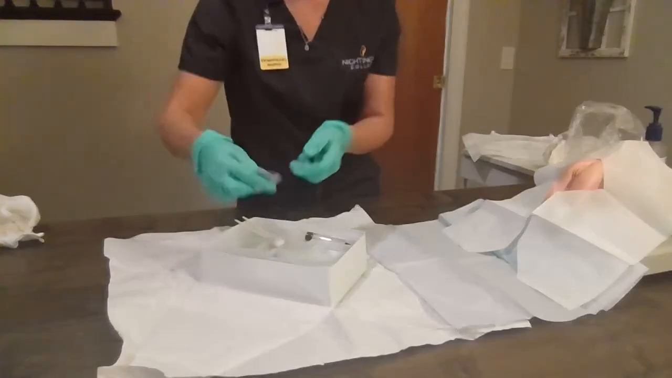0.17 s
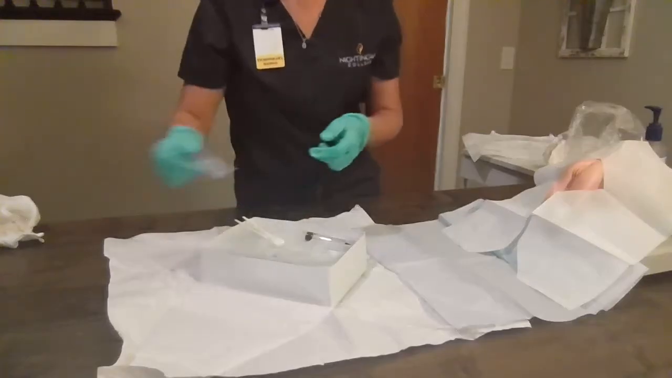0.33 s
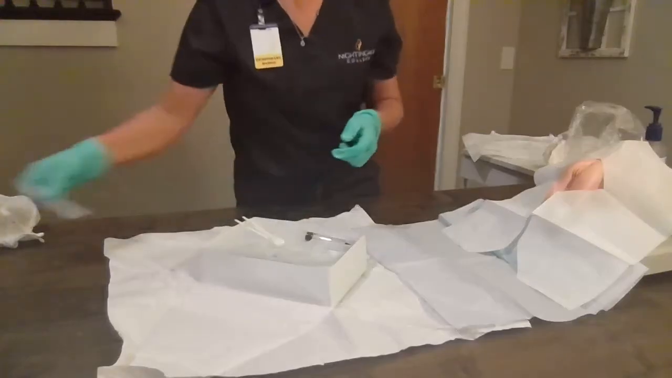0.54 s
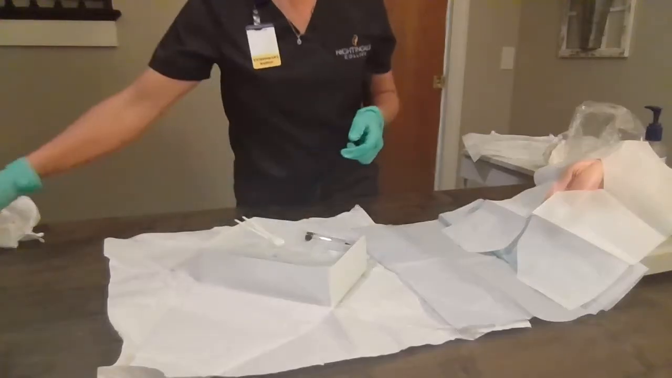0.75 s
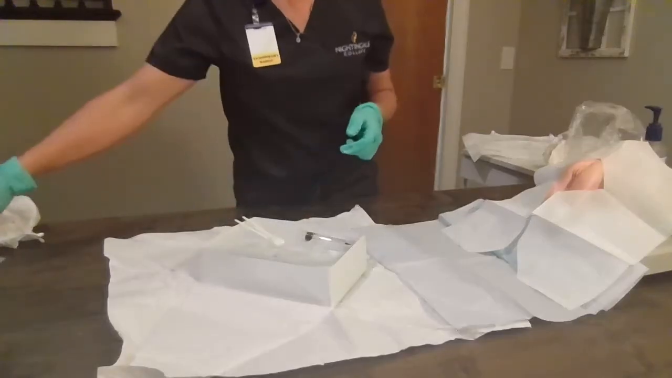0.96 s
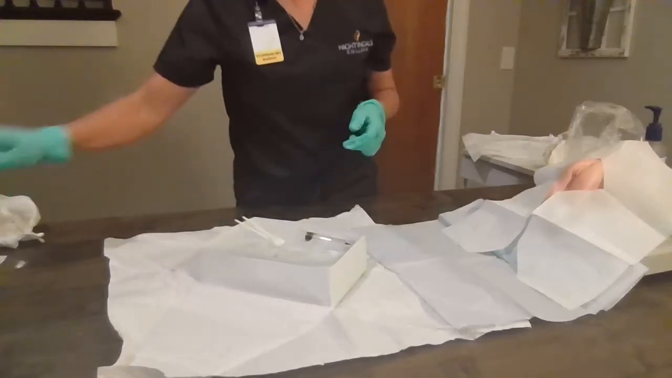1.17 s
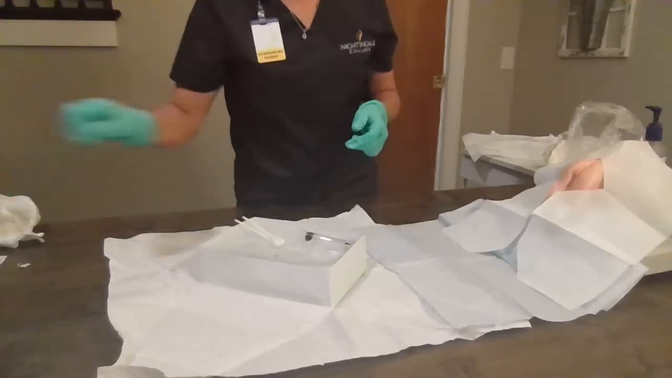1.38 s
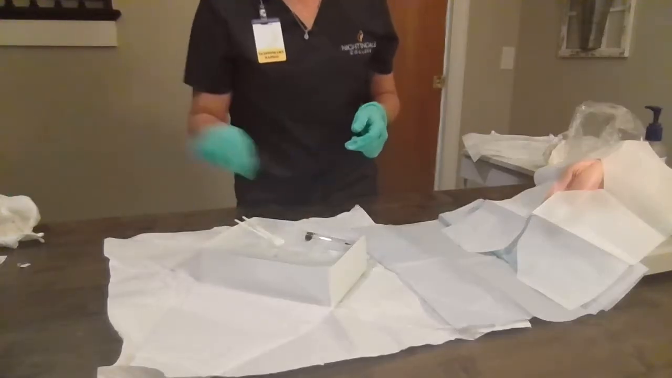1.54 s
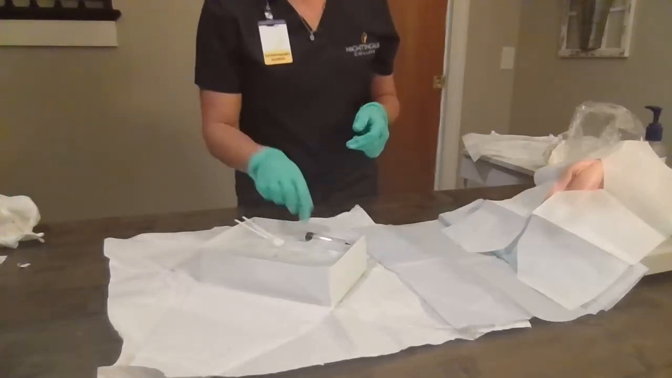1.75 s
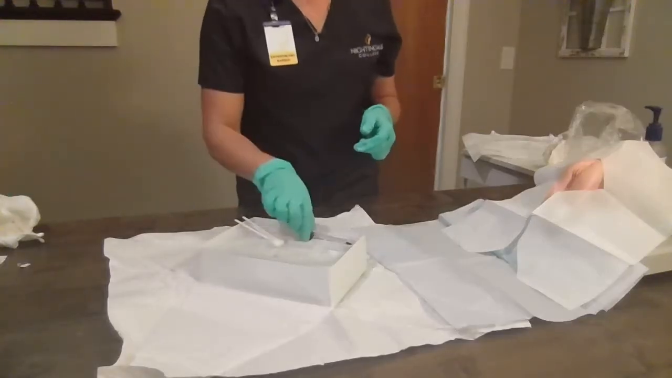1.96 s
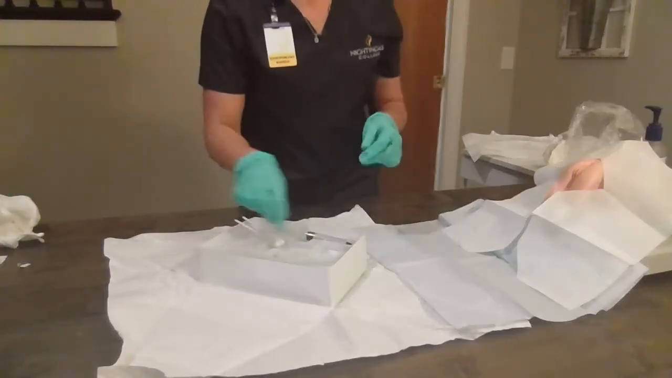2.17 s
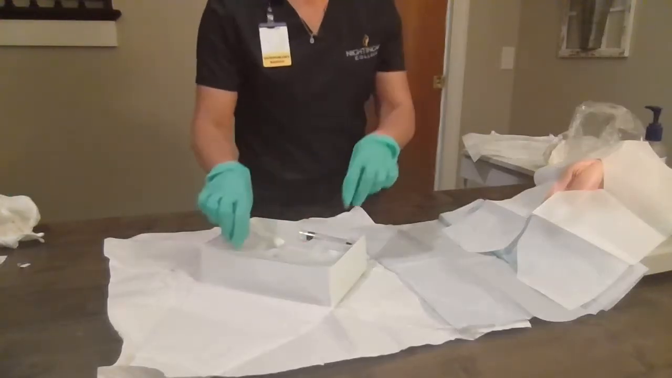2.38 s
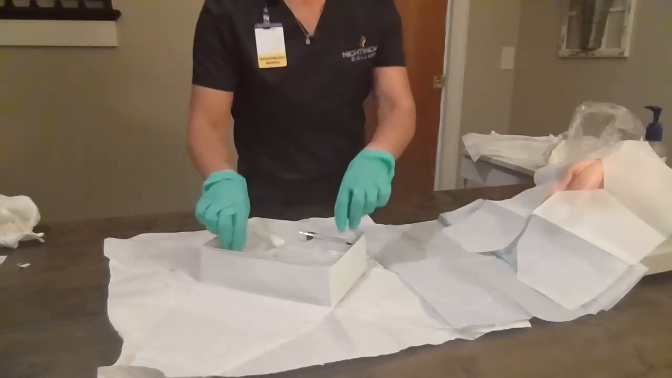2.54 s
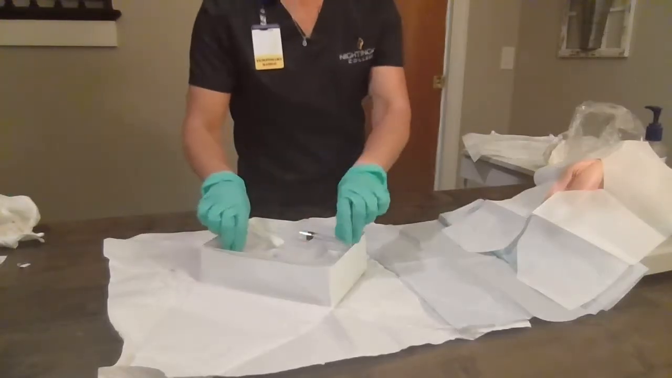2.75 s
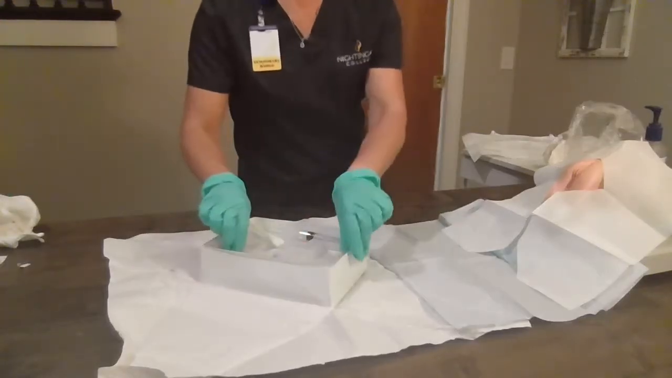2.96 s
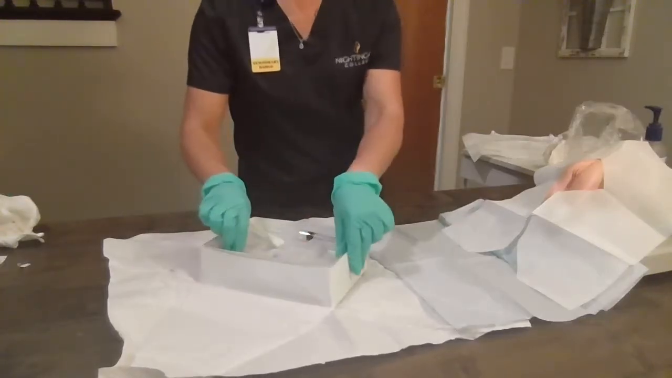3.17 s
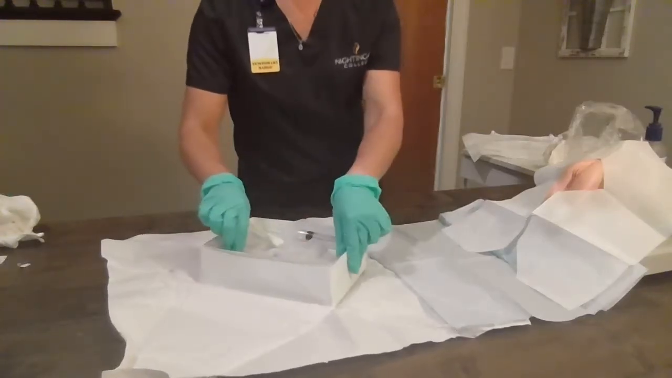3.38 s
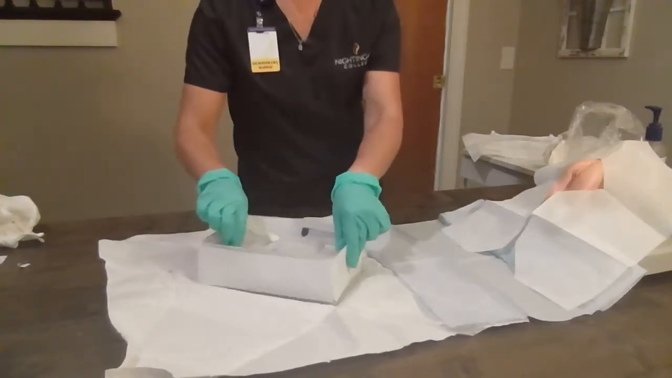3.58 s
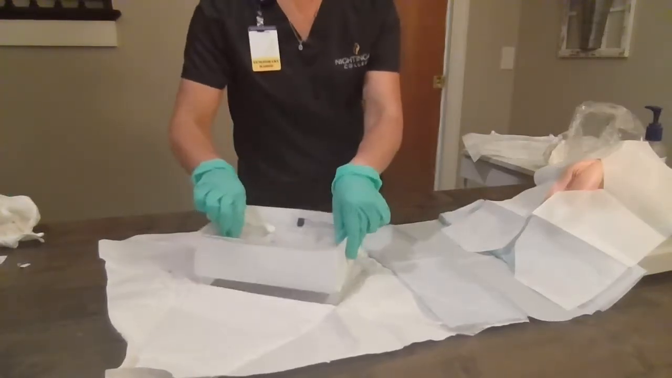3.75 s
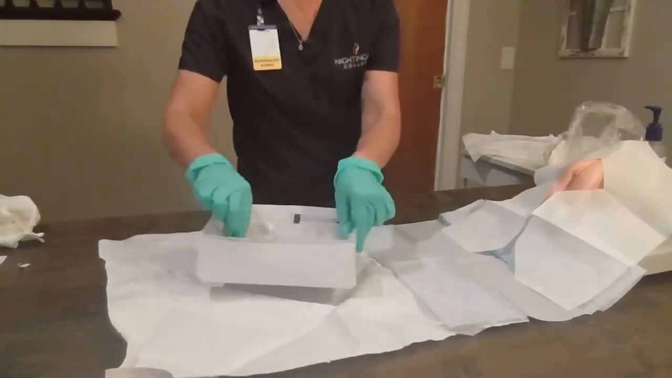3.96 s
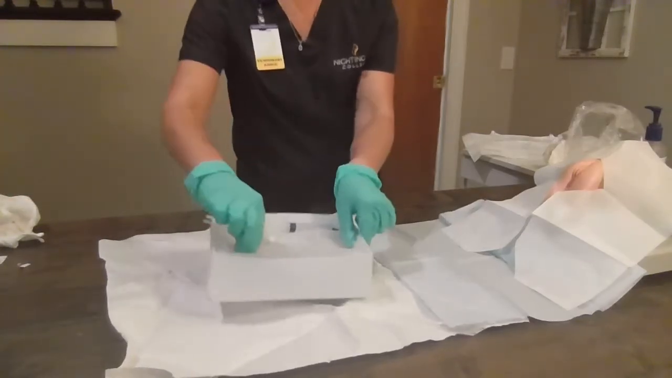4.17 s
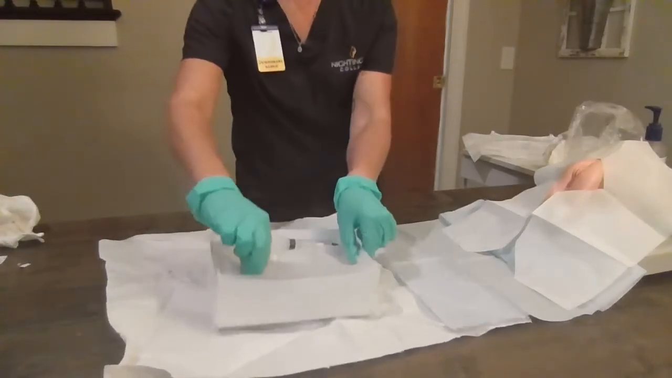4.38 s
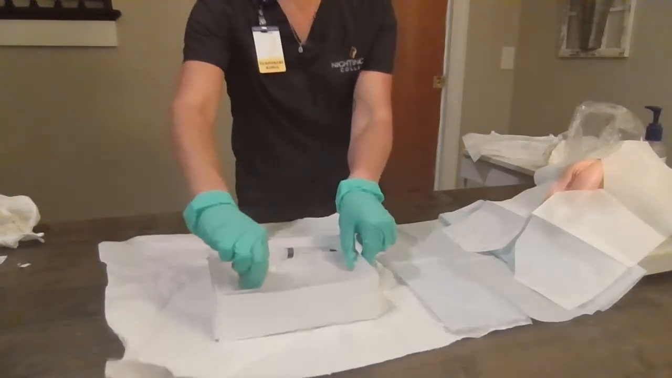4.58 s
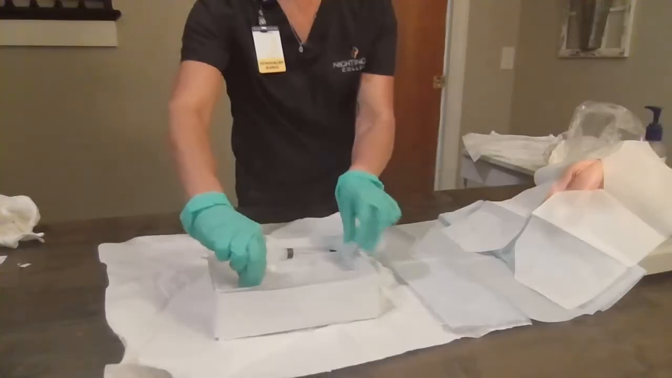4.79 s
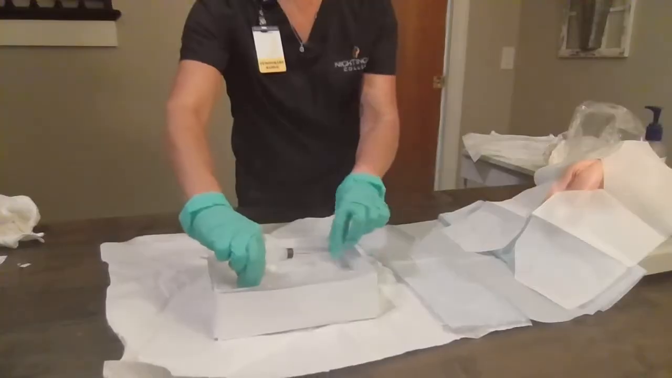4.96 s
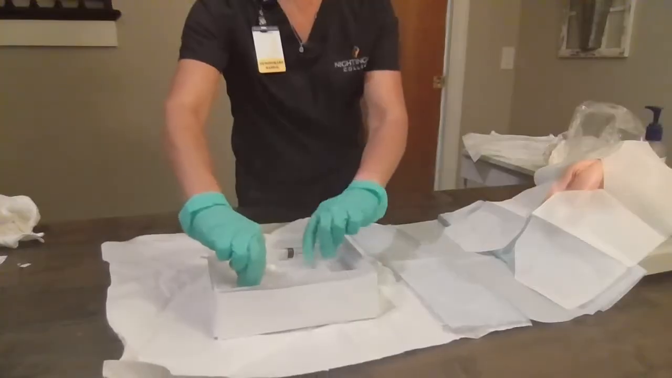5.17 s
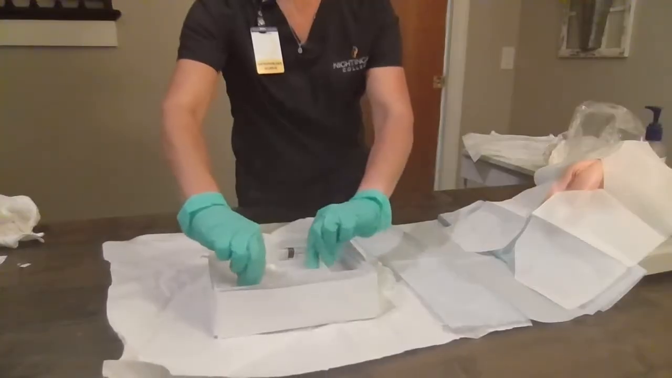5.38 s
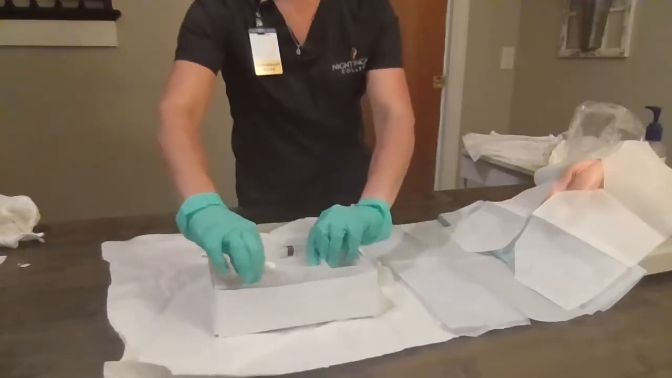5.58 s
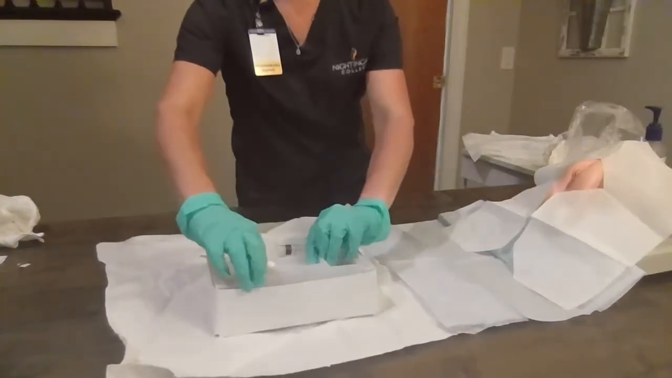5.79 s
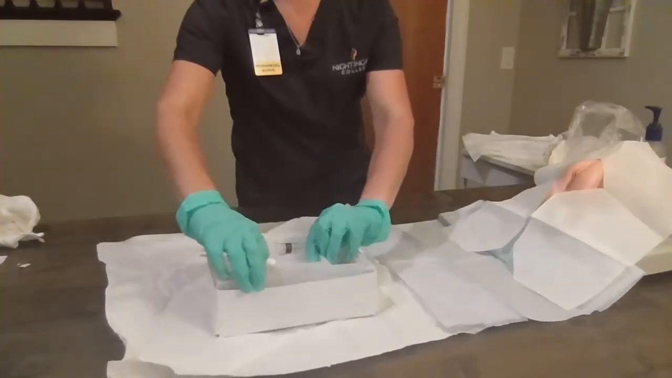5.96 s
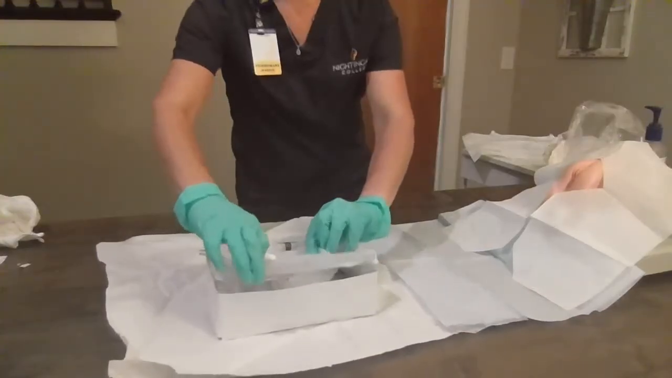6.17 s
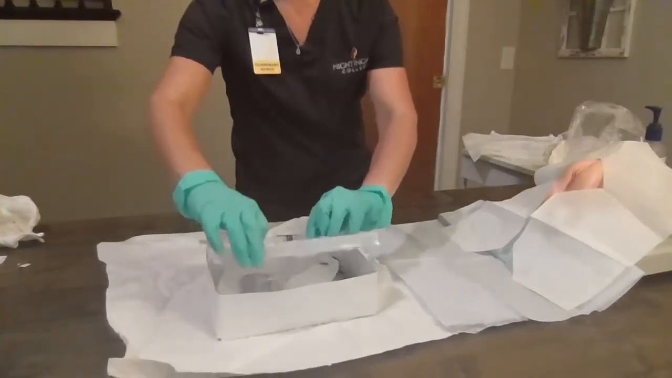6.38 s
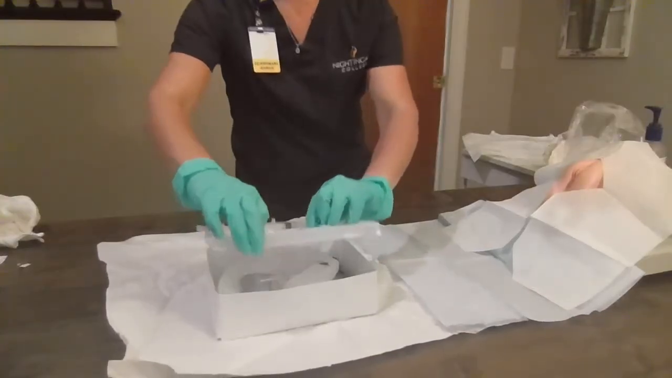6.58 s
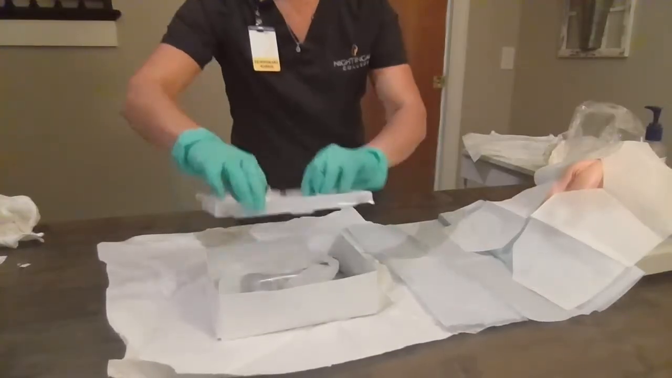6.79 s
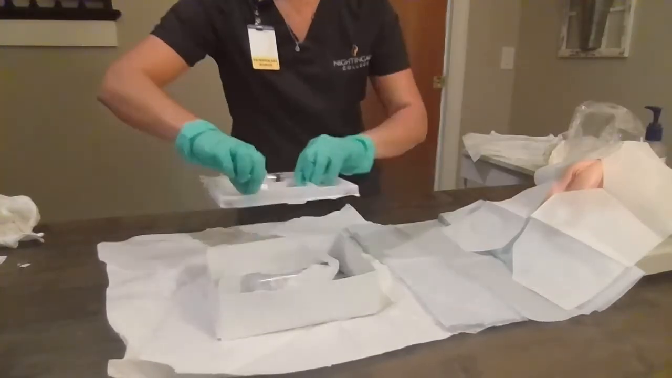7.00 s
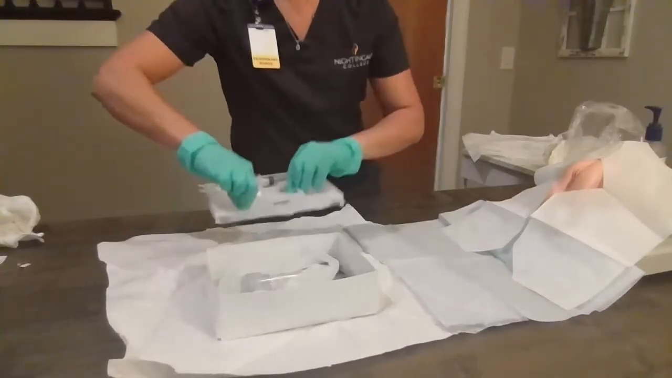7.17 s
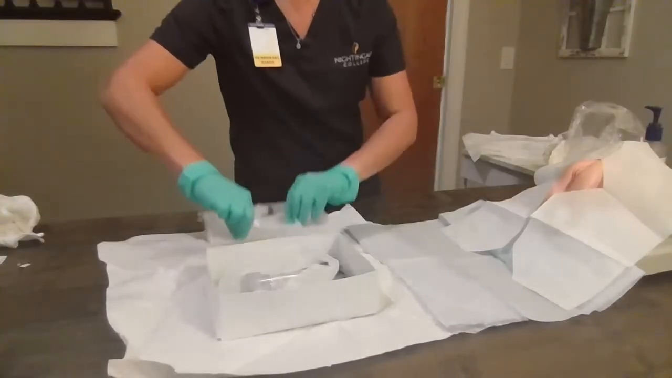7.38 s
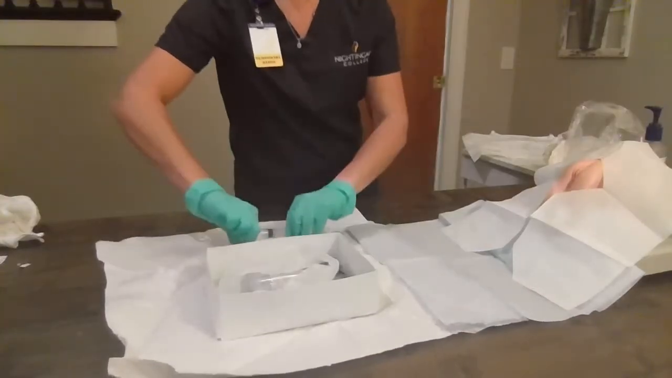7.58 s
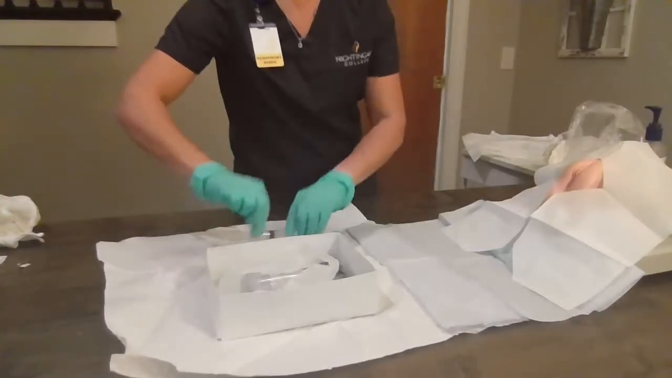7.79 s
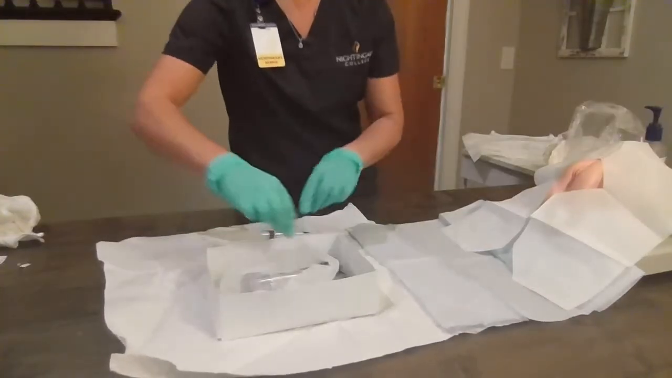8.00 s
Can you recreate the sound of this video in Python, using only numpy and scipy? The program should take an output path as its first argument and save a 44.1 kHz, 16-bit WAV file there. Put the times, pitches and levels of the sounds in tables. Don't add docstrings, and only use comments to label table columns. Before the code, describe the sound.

Gloved hands handle a thin hollow plastic tray: faint taps and rustles, a soft set-down, then loud cracking pops as its insert pulls free.

```python
import sys
import numpy as np
from scipy import signal
from scipy.fft import rfft, irfft
from scipy.io import wavfile
from scipy.ndimage import uniform_filter1d

SR = 44100
rng = np.random.default_rng(int(sys.argv[2]) if len(sys.argv) > 2 else 0)


def invert_db(level):
    return 10 ** (np.asarray(level, dtype=float) / 20)


def store_wav(level_fs):
    pcm = np.round(np.clip(np.atleast_2d(level_fs), -1, 1) * 32767)
    wavfile.write(sys.argv[1], SR, pcm.T.astype(np.int16))


N = 354475


def unit(x):
    return x / np.sqrt(np.mean(x ** 2))


def band(x, lo_hz, hi_hz):
    return signal.sosfilt(signal.butter(2, [lo_hz, min(hi_hz, .45 * SR)], "band", fs=SR, output="sos"), x)


def add(out, s, x):
    i = int(s * SR)
    out[i:i + len(x)] += x[:N - i]


def walk(rate_hz):
    hold = int(SR / rate_hz)
    levels = np.repeat(rng.standard_normal(N // hold + 1), hold)
    return np.sqrt(3 / 2) * uniform_filter1d(levels, hold)[:N]


def swell(s, rise_s, fall_s, db, roundness):
    t = np.arange(N) / SR - s
    distance = np.where(t < 0, -t / max(rise_s, .002), t / max(fall_s, .002))
    return invert_db(db - 20 * distance ** roundness)


def ringing(modes, t, weight_db=0):
    hz, db, t60 = np.transpose(modes)[:, :, None]
    decay = 1000. ** (-t / np.maximum(t60, .005))
    return np.sum(invert_db(db + weight_db) * np.sin(2 * np.pi * hz * t) * decay, axis=0)


def knocks(table, modes, slope_db, under_db, top_hz, blow=.95, count=64):
    out, t = np.zeros(N), np.arange(6144) / SR

    def tilt(octave):
        return np.where(octave > 0, slope_db, under_db) * octave

    for s, db, hz, crack_db, chatter_s in table:
        noise = rng.standard_normal((3, len(t)))

        crowd = np.linspace(-.9, 2.5, count) + .03 * rng.standard_normal(count)
        octave = np.r_[0, crowd][:, None]
        size = np.tanh(2 * noise[2, :count + 1, None]) * invert_db(-4 + tilt(octave))
        size[0] = 1.3
        t60 = .03 * 2 ** (-.4 * octave)
        ring = np.sum(size * np.sin(2 * np.pi * hz * 2 ** octave * t) * 1000. ** (-t / t60), axis=0)

        mode_hz = np.array(modes)[:, :1]
        spot_db = 5 * noise[2, -len(modes):, None] + tilt(np.log2(mode_hz / hz))
        ring = ring + ringing(modes, t, spot_db)

        age = t / max(chatter_s, .0005)
        fade = np.exp(-age) if blow else age * np.exp(1 - age) * np.exp(-.3 * age ** 2)
        push = .25 * noise[0] * np.minimum(abs(noise[0]), 2) * fade
        push[0] = blow
        body = band(signal.fftconvolve(push, ring)[:len(t)], 0.52 * hz, top_hz)
        body = band(body, 210, 14000)
        crack = band(noise[1] * fade, 3600, 13000)
        tick = band(np.exp(-t / 0.00006), 0.76 * hz, 3 * hz) * (blow > 0)
        knock = body / abs(body).max()
        knock = knock + invert_db(-7) * tick / (abs(tick).max() + 1e-9)
        knock = knock + invert_db(crack_db - 4.5) * crack / abs(crack).max()
        add(out, s, invert_db(db) * knock)
    return out


# (frequency [Hz], level [dB], t60 [s])
TRAY_MODES = [(296, -18, 0.15), (376, -15.5, 0.056), (471, -6, 0.09), (631, 6.5, 0.04), (775, 4, 0.035),
              (945, -7.5, 0.038), (1116, -3, 0.043), (1274, 2.5, 0.042), (1560, 0, 0.027),
              (1900, -11, 0.082), (2120, -26.5, 0.044), (2790, -19, 0.064), (3180, -13.5, 0.034),
              (3970, -45, 0.027)]
# (time [s], peak [dB], main ring [Hz], treble crack [dB], chatter time [s])
POPS = [(5.587, -30.5, 950, 6.5, 0.043), (5.607, -21.5, 1230, -19, 0.0074),
        (5.874, -17, 617, -32.5, 0.0048), (5.939, -20, 566, -1, 0.0075), (6.003, -15, 1300, -3, 0.012),
        (6.0135, -6.5, 480, 3, 0.0016), (6.1575, -8, 623, -1, 0.0032), (6.167, -17.5, 673, -3, 0.0092),
        (6.26, -13, 1325, 0.5, 0.0031), (6.277, -12.5, 1270, 2, 0.009), (6.2985, -14, 1300, 4, 0.0045),
        (6.318, -20, 1445, 2, 0.0068), (6.344, -14.5, 1350, -9.5, 0.0057), (6.4805, -1, 698, -1.5, 0.0036),
        (6.484, -5, 460, -20.5, 0.0033), (6.491, -11, 1100, -15.5, .012)]


def insert_pops():
    return knocks(POPS, TRAY_MODES, slope_db=-1, under_db=14.5, top_hz=9000)


# (time [s], peak [dB], main ring [Hz], treble crack [dB], chatter time [s])
TRAY_KNOCKS = [
    (3.218, -29.5, 1570, 1, 0.014),
    (4.528, -22.5, 873, -20, 0.0073),
    (4.59, -27.5, 950, -30, 0.0074),
    (4.628, -31.5, 800, -30, 0.0061),
    (4.638, -30, 647, -30, 0.0086),
    (4.723, -26.5, 907, -35, 0.012),
]


def tray_knocks():
    return knocks(TRAY_KNOCKS, TRAY_MODES, slope_db=0.5, under_db=12, top_hz=6000)


# (time [s], peak [dB], main ring [Hz], treble crack [dB], time to the peak [s])
SCUFFS = [(1.876, -47, 1400, -15, 0.011), (2.671, -44.5, 640, -29, 0.0048), (2.949, -51, 1130, -28, 0.031),
          (3.374, -39, 740, -17, 0.0032), (3.49, -47, 1300, -23.5, 0.028), (3.716, -40, 1130, -6, 0.015),
          (4.482, -31, 560, 1, 0.034), (4.538, -32, 950, -11, 0.0089), (4.806, -45.5, 664, -9, 0.0091),
          (4.859, -46.5, 910, 3, 0.013), (5.099, -56, 750, 10, 0.011), (5.386, -34.5, 630, -25, 0.014),
          (5.508, -32, 466, -24, 0.014), (5.568, -23.5, 945, -17, 0.041), (5.715, -23.5, 580, -22, 0.011),
          (5.826, -22, 590, -11, 0.016), (5.848, -15, 620, -10, 0.011), (6.088, -15, 630, -6, 0.018)]


def tray_scuffs():
    return knocks(SCUFFS, TRAY_MODES, slope_db=-6, under_db=15.5, top_hz=6000, blow=0)


# (frequency [Hz], level [dB], t60 [s])
INSERT_MODES = [(420, -22, 0.067), (800, -5, 0.13), (1100, -17, 0.13), (1300, -11, 0.08), (1500, 7, 0.03),
                (1625, -6, 0.047), (1900, -5.5, 0.05), (2328, -6.5, 0.037), (2703, -1.5, 0.034),
                (3100, -2, 0.035), (3480, -16, 0.033), (4720, -10, 0.045), (5500, -11, 0.035)]
# (time [s], peak [dB], main ring [Hz], treble crack [dB], chatter time [s])
RATTLES = [
    (6.793, -34, 1450, -26, 0.0047),
    (6.821, -22.5, 1500, -10, 0.0068),
    (7.005, -42.5, 760, -40, 0.006),
    (7.059, -39, 1460, -36.5, 0.014),
    (7.097, -47, 1500, -30, 0.0058),
    (7.365, -27, 1595, -24, 0.0053),
    (7.372, -29.5, 847, -38, 0.05),
    (7.476, -20, 1303, -14, 0.017),
    (7.676, -26, 1300, -1, 0.0047),
    (7.685, -24, 1900, -6, 0.034),
]


def insert_rattles():
    return knocks(RATTLES, INSERT_MODES, slope_db=-0.2, under_db=7, top_hz=7000)


# (time [s], peak [dB], main ring [Hz], treble crack [dB], time to the peak [s])
SLIDES = [
    (6.812, -19.5, 1500, -15, 0.012),
    (7.088, -26.5, 800, -40, 0.012),
    (7.39, -22, 825, -34, 0.02),
    (7.626, -21, 1533, -3.5, 0.019),
]


def insert_slides():
    return knocks(SLIDES, INSERT_MODES, slope_db=-0.5, under_db=37, top_hz=7000, blow=0)


# (frequency [Hz], level [dB], t60 [s])
SCRAP_MODES = [(705, -3, .05), (1100, -8, .04), (1570, -1, .06), (1710, -7, .035), (1940, -4, .06),
               (2200, -5, .06), (2540, -5, .03), (2920, -6, .035), (3880, -15, .03)]
# (time [s], peak [dB], main ring [Hz], treble crack [dB], chatter time [s])
DROPS = [
    (0.904, -38.5, 1100, -25, 0.007),
    (0.9195, -20, 728, -10, 0.0071),
    (0.919, -21.5, 1500, -20, 0.0033),
    (0.93, -19.5, 730, -2, 0.0042),
    (0.944, -24, 1680, -20, 0.017),
    (0.996, -24.5, 1010, -1, 0.0078),
    (1.012, -41, 2900, -23, 0.01),
]


def scrap_drops():
    return knocks(DROPS, SCRAP_MODES, slope_db=-3.5, under_db=12, top_hz=3600)


CLIP_MODES = [(480, -15, 0.061), (617, 0.5, 0.038), (800, -3.5, 0.093), (1100, 9.5, .03), (1230, -8, 0.034),
              (1640, -1.5, 0.049), (2420, -22, .04), (3100, 1.5, 0.028), (3500, -9, 0.033),
              (4100, -17, 0.037), (4500, -8, .04)]
CLIP_TAPS = [
    (1.931, -21, 1156, -23, 0.024),
    (1.949, -26, 1100, -18, 0.015),
    (1.9645, -20.5, 660, -17, 0.0051),
    (1.979, -19, 1100, -15, 0.0016),
    (1.989, -19.5, 800, -13, 0.0016),
    (1.997, -19, 623, -22, 0.0018),
    (2.005, -25, 615, -26, 0.0065),
]


def clip_taps():
    return knocks(CLIP_TAPS, CLIP_MODES, slope_db=0.5, under_db=-12, top_hz=5000)


# (time [s], peak [dB], centre frequency [Hz])
CLICKS = [(0.9213, -33, 2200), (0.997, -26, 1900), (4.521, -26, 2500), (4.466, -41, 3000),
          (4.628, -31, 1500), (5.72, -31, 900), (1.965, -37, 1500), (1.9912, -21, 2000), (4.59, -30, 1800),
          (5.5955, -27, 3000), (5.6095, -32, 2000), (5.8567, -12.5, 1500), (5.877, -23, 1790),
          (6.0035, -18, 5000), (6.1586, -5.5, 2800), (6.2606, -24, 1800), (6.278, -24, 2500),
          (6.3, -17, 2800), (6.345, -22.5, 1820), (6.4817, -3.5, 1360), (7.479, -27, 2000),
          (5.39, -40, 1200), (7.067, -38, 1500)]


def clicks():
    out, t = np.zeros(N), np.arange(512) / SR
    for s, db, hz in CLICKS:
        swing = np.sin(2 * np.pi * hz * t) * np.exp(-t * hz / 0.72)
        swing = np.diff(swing, prepend=0)
        swing = band(swing, 0.6 * hz, 4.1 * hz)
        add(out, s, invert_db(db) * swing / abs(swing).max())
    return out


# (time [s], peak [dB], centre frequency [Hz], length [s])
SNAPS = [(0.888, -30, 8200, 0.0013), (0.918, -13, 10350, 0.0044), (0.927, -11.5, 9100, 0.0034),
         (0.972, -21, 8450, 0.002), (0.997, -24, 2860, 0.005), (1.93, -15, 3330, 0.011),
         (1.9903, -11, 3380, 0.0058), (2.467, -34, 9100, 0.0071), (3.46, -35, 4690, 0.0052),
         (4.447, -26, 4250, 0.0021), (4.464, -25, 5500, .002), (4.483, -31, 4450, .003),
         (4.505, -19, 4270, .003), (4.521, -18, 3250, .002), (4.529, -18, 3700, .005),
         (4.587, -31, 3700, .003), (4.72, -25, 3500, 0.0083), (6.297, -9.5, 3500, 0.0048),
         (6.11, -18.5, 2810, .006), (6.37, 3, 2100, 0.0056), (6.416, -20, 2160, .005),
         (4.628, -20, 3480, 0.0056), (5.595, -7, 5830, 0.0026), (5.603, -11.5, 3100, 0.011),
         (5.851, -24.5, 5640, 0.011), (5.939, -24, 8000, 0.004), (6.016, -2.5, 4510, 0.0047),
         (6.14, -17, 7140, 0.0076), (6.157, -0.5, 6160, 0.0035), (6.158, -5.5, 3220, .003),
         (6.172, -5, 8300, 0.003), (6.268, -10, 6080, 0.0032), (6.34, -23, 3450, 0.0036),
         (6.544, -1.5, 5700, 0.0064), (6.5405, -14, 3100, 0.0046), (6.541, -4.5, 8300, 0.0053),
         (6.002, -10, 8140, 0.003), (6.823, -30, 3100, 0.0033), (7.007, -29, 4080, 0.01),
         (7.312, -22, 9500, 0.0012), (7.314, -27, 14200, 0.00098), (7.686, -20, 9400, 0.0017),
         (7.468, -21, 3050, 0.013), (7.478, -17.5, 3450, 0.021), (7.628, -13, 4940, 0.0034),
         (7.674, -10.5, 3560, 0.0067)]


def snaps():
    out, t = np.zeros(N), np.arange(4096) / SR
    for s, db, hz, length_s in SNAPS:
        burst = rng.standard_normal(len(t)) * np.exp(-t / max(length_s, .0003))
        snap = band(burst, 0.948 * hz, 1.117 * hz) * 2.35 + 0.38 * band(burst, 2400, 9300)
        add(out, s, invert_db(db - 12.5) * snap / abs(snap).max())
    return out


def grains(per_s, spread_db, smooth):
    happens = rng.random(N) < per_s / SR
    slips = happens * invert_db(spread_db * rng.standard_normal(N)) * rng.standard_normal(N)
    return unit(slips) + smooth * rng.standard_normal(N)


def shaken(x, modes):
    held_damping, wander_db = 3., 4
    y = 0
    for hz, db, t60 in modes:
        feed = invert_db(wander_db * np.tanh(walk(35)))
        resonance = signal.iirpeak(hz, hz * t60 / held_damping / 2, SR)
        y = y + invert_db(db) * t60 * signal.lfilter(*resonance, x * feed)
    return unit(band(y, 274, 8900))


# (peak time [s], rise [s], fall [s], level [dB], brightness [dB])
SORTING = [(1.25, 0.12, 0.022, -70.5, 13), (1.88, 0.016, .04, -56, -6), (2.1, .08, 0.13, -78, 14),
           (2.45, 0.074, 0.069, -59, -1.5), (2.6, 0.1, 0.081, -56, -2), (2.685, 0.11, 0.1, -54.5, -8),
           (2.978, 0.05, 0.033, -51, -12), (3.1, 0.063, 0.091, -52, 3.5), (3.19, 0.14, 0.074, -64, 16.5),
           (3.225, 0.041, 0.077, -44, -26), (3.392, 0.065, 0.05, -47, -20), (3.51, 0.34, 0.11, -57.5, 2.5),
           (3.6, 0.13, 0.11, -64, 9.5), (3.73, 0.23, 0.046, -62.5, -22)]
# (peak time [s], rise [s], fall [s], level [dB], brightness [dB])
CARRYING = [(4.2, 0.38, 1, -62.5, -0.5), (4.4, 0.29, 0.066, -78.5, 22.5), (4.489, 0.085, 0.13, -40, 2.5),
            (4.64, 0.014, 0.043, -37.5, -4), (4.665, .03, 0.03, -57.5, 10), (4.72, 0.062, 0.065, -48, -11),
            (4.82, 0.11, 0.15, -54.5, 3.5), (5.1, 0.12, 0.27, -64, 1.5), (5.399, 0.06, 0.12, -49, -15),
            (5.49, 0.16, 0.42, -60, 15.5), (5.599, 0.035, 0.039, -29.5, 0), (5.705, 0.1, 0.046, -60.5, 21),
            (5.727, 0.019, 0.029, -44.5, 5)]
# (peak time [s], rise [s], fall [s], level [dB], brightness [dB])
PULLING = [(5.81, 0.054, .05, -66, -7), (5.857, 0.034, 0.064, -25.5, -12), (5.98, 0.12, 0.064, -27, -16.5),
           (6.012, 0.014, 0.0071, -19, -2.5), (6.1, 0.13, 0.17, -26, -8), (6.221, 0.14, .1, -29.5, -8.5),
           (6.157, 0.006, 0.05, -21, 6), (6.3, 0.2, 0.2, -35, 1), (6.419, 0.34, 0.2, -24.5, -9),
           (6.481, 0.003, 0.029, -18.5, -15), (6.544, 0.005, 0.018, -20.5, -3),
           (6.531, .04, 0.14, -27.5, -10.5), (6.62, 0.067, 0.064, -37, -13.5)]
# (peak time [s], rise [s], fall [s], level [dB], brightness [dB])
LAYING = [
    (6.83, 0.03, 0.079, -34.5, -12.5),
    (7.01, 0.0081, 0.06, -47.5, -24),
    (7.1, 0.1, 0.09, -49.5, -10),
    (7.38, 0.035, 0.057, -46.5, -5),
    (7.45, 0.05, 0.15, -46, -29),
    (7.55, 0.15, 0.063, -43, -4),
    (7.64, 0.1, 0.11, -41.5, -4.5),
    (7.72, 0.08, 0.061, -45.5, -4),
]
# (peak time [s], rise [s], fall [s], level [dB], brightness [dB])
SCRAP_STROKES = [
    (.935, 0.027, 0.16, -39.5, -1.5),
    (1.02, 0.11, 0.14, -43, -27),
    (1.1, 0.1, 0.037, -44.5, -16),
]
CLIP_STROKES = [
    (1.935, 0.018, 0.082, -43.5, 1),
    (1.998, 0.038, 0.026, -36, -18),
    (2.05, .04, 0.053, -63, -17),
]


def rubbing():
    slip, flicker = grains(1600, 3.6, .85), invert_db(1.5 * walk(90))

    def patches(lo_hz, hi_hz):
        total = 0
        for f in lo_hz * 2 ** np.arange(0, np.log2(hi_hz / lo_hz), 1 / 6):
            total = total + invert_db(2.6 * walk(30)) / f ** .25 * band(slip, f, f * 2 ** (1 / 6))
        return unit(total)

    duller = signal.butter(3, 2300, fs=SR)
    walls = unit(signal.lfilter(*duller, patches(401.2, 4000)))
    glove = patches(1905, 6400)
    paper = unit(band(slip, 6000, 24800))
    rubbed = [(SORTING + CARRYING + PULLING, TRAY_MODES, 0), (LAYING, INSERT_MODES, -5),
              (SCRAP_STROKES, SCRAP_MODES, 3), (CLIP_STROKES, CLIP_MODES, -3)]
    out = 0
    for rows, modes, walls_db in rubbed:
        bright_db = np.array(rows)[:, -1]
        strokes = np.array([swell(*row[:-1], roundness=1.03) ** 2 for row in rows])

        def press(db):
            return np.sqrt(invert_db(db) ** 2 @ strokes)

        shell = unit(shaken(slip, modes) + invert_db(walls_db) * walls)
        out = out + press(0 * bright_db) * shell
        out = out + press(-1.5 + 0.68 * bright_db) * glove
        out = out + press(bright_db) * paper
    return flicker * out


# (time [s], level [dB], frequency [Hz], width [Hz], length [s])
HUMS = [(0.085, -65.5, 630, 60, 0.16), (1.06, -56, 740, 120, .05), (1.085, -58, 3080, 120, .035),
        (1.875, -54, 600, 250, .055), (2.101, -53, 1030, 160, 0.075), (2.442, -58, 5463, 3500, 0.093),
        (2.96, -57, 1400, 300, .04), (3.065, -59, 2800, 305, 0.1), (3.37, -45, 760, 90, 0.037),
        (3.372, -49, 1450, 250, 0.04), (3.48, -58, 1250, 200, .09), (3.57, -60, 5600, 900, 0.07),
        (3.72, -55, 790, 90, .04), (3.72, -55, 1100, 93, .04), (4.68, -55, 370, 50, 0.085),
        (5.085, -61, 1400, 140, 0.037), (5.095, -60, 780, 93, .05), (5.39, -47, 1300, 600, .03),
        (5.26, -60, 1270, 90, .06), (6.56, -33, 650, 500, .14), (6.58, -37, 1300, 500, .16),
        (6.68, -47, 800, 900, .1), (6.792, -36, 1496, 108, 0.018), (6.793, -50, 2780, 93, 0.044),
        (7.011, -47, 790, 65, 0.048), (7.058, -40, 1480, 160, .025), (7.304, -60, 370, 56, .06),
        (7.39, -40, 1450, 350, .035), (7.793, -61, 1900, 78, 0.045), (7.935, -62, 629, 71, 0.025)]


def hums():
    out = np.zeros(N)
    for s, db, hz, width_hz, length_s in HUMS:
        age = np.arange(int(length_s * SR)) / (length_s * SR)
        shape = np.minimum(1, 12 * age) * np.minimum(1, 6 * (1 - age)) * np.exp(-age)
        noise = rng.standard_normal(8192 + len(age))
        tone = band(noise, hz - width_hz / 2, hz + width_hz / 2)[8192:]
        add(out, s, invert_db(db) * shape * unit(tone))
    return out


# (time [s], level [dB], frequency [Hz], t60 [s])
THUMPS = [
    (4.526, -32, 62.4, 0.14),
    (6.158, -39, 141, 0.097),
    (6.487, -28.5, 144, 0.17),
    (7.635, -53, 121, 0.07),
]


def thumps():
    out, t = np.zeros(N), np.arange(SR // 2) / SR
    for s, db, hz, t60 in THUMPS:
        add(out, s, ringing([(hz, db, t60)], t) * (1 - np.exp(-t / 0.0039)))
    return out


# (peak time [s], level [dB], fall [s])
BUMPS = [(.93, -66, 0.3), (1.97, -68, 0.082), (2.06, -55, 0.14), (2.28, -70, .12), (2.6, -82, 0.089),
         (2.72, -69, 0.47), (3.22, -60, 0.067), (3.51, -55.5, 0.14), (3.8, -57, 0.1), (4.54, -44, 0.057),
         (4.86, -65, 0.2), (5.4, -57.5, 0.43), (5.62, -43.5, 0.025), (5.86, -60, 0.16),
         (6.178, -40.5, 0.034), (6.51, -45, 0.058), (6.85, -62, 0.13), (7.65, -44.5, 0.088)]
# (peak time [s], level [dB], fall [s])
BOOMS = [
    (.93, -48, 0.17),
    (1.942, -51, 0.083),
    (3.22, -48, 0.082),
    (6.5, -51, 0.13),
]


def thuds():
    level = invert_db(-73.5 + 2 * walk(23))
    level = level + sum(swell(s, 0.036, fall_s, db, 0.59) for s, db, fall_s in BUMPS)
    boom = sum(swell(s, 0.019, fall_s, db, 1.0) for s, db, fall_s in BOOMS)
    bass = unit(band(rng.standard_normal(N), 45, 135))
    return level * bass + boom * unit(band(rng.standard_normal(N), 121, 312))


def clothes():
    stir = walk(3.83)
    out = 0
    for f in 500 * 1.4 ** np.arange(9):
        level = invert_db(-74.5 + 1.6 * stir + 3.2 * walk(14))
        out = out + level * unit(band(rng.standard_normal(N), f, 1.35 * f))
    return out


# (frequency [Hz], level [dB])
HUSH = [(30, -19), (55, -1), (100, 2.5), (200, 2.5), (650, -1), (820, -8.5), (2200, -0.5), (4700, -4.5),
        (5300, -12.5), (6900, -26), (7600, -39.5), (8300, -38), (8900, -8.5), (15500, -8)]
# (frequency [Hz], level [dB])
WHINE = [(303, -76.5), (360, -78), (4861, -70), (13440, -95.5), (15400, -100)]


def hush():
    hz, db = np.transpose(HUSH)
    f = np.arange(N // 2 + 1) * SR / N + 1
    shape = invert_db(np.interp(np.log(f), np.log(hz), db))
    air = unit(irfft(rfft(rng.standard_normal(N)) * shape, N))
    t = np.arange(N) / SR
    tones = 0
    for tone_hz, tone_db in WHINE:
        level = invert_db(tone_db + 3.0 + 1.8 * walk(5.0))
        tones = tones + level * np.sin(2 * np.pi * tone_hz * t + .5 * walk(6.2))
    return air * invert_db(-60 + 0.205 * walk(1.7)) + tones


# (frequency [Hz], t60 [s])
ROOM = [(100, 0.068), (500, 0.26), (2000, 0.24), (3500, 0.15), (6000, 0.2), (15000, 0.078)]


def room(x):
    t = np.arange(SR // 2) / SR
    hz, t60 = np.transpose(ROOM)
    tail = 0
    for f in 60 * 2 ** np.arange(0, 8, 1 / 3):
        decay = 1000. ** (-t / np.interp(np.log(f), np.log(hz), t60))
        tail = tail + band(rng.standard_normal(len(t)), f, f * 2 ** (1 / 3)) * decay
    tail = tail * np.clip(t / 0.0015 - 1, 0, 1)
    return x + invert_db(-10) * signal.fftconvolve(x, tail / np.sqrt(np.sum(tail ** 2)))[:N]


def scene():
    struck = insert_pops() + tray_knocks() + insert_rattles() + scrap_drops() + clip_taps()
    brushed = tray_scuffs() + insert_slides()
    mono = room(struck + brushed + clicks())
    mono = mono + room(snaps() + rubbing() + hums() + clothes())
    mono = mono + thumps() + thuds() + hush()
    return np.array([mono, mono])


def band_limit(x):
    return signal.sosfilt(signal.butter(12, 16970, fs=SR, output="sos"), x)


def record(dry):
    dim = signal.ellip(6, .3, 28, 15750, fs=SR, output="sos")
    rounded = .92 * np.tanh(np.tanh(dry / 2.525) * 2.0 / .92 * 1.05)
    return band_limit(signal.sosfilt(dim, rounded))


dry = scene()
out = record(dry)
store_wav(out)
```